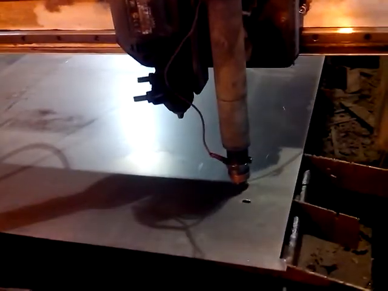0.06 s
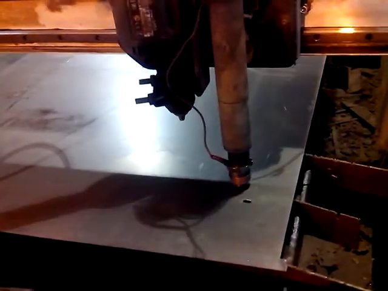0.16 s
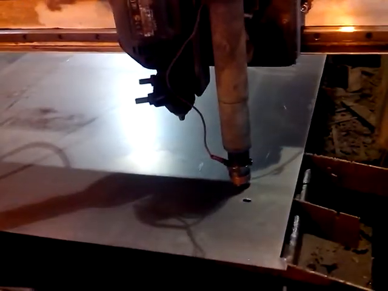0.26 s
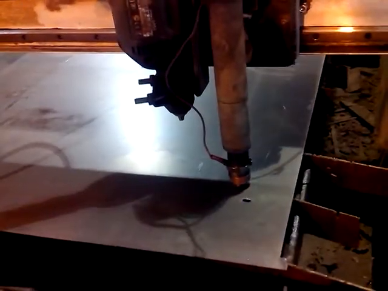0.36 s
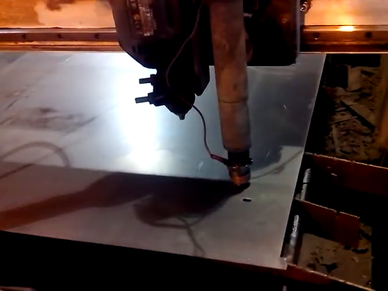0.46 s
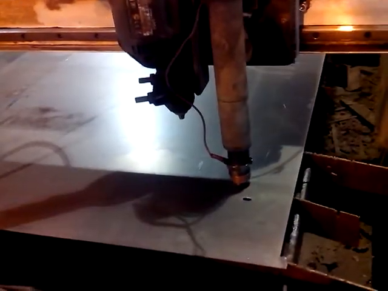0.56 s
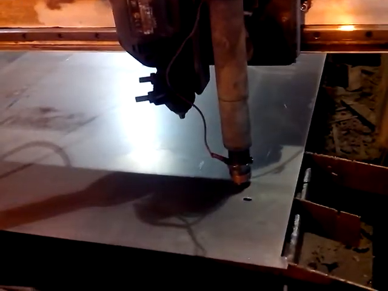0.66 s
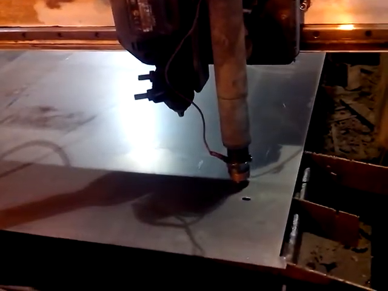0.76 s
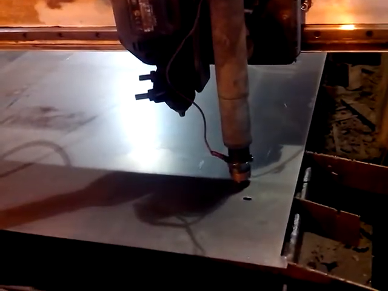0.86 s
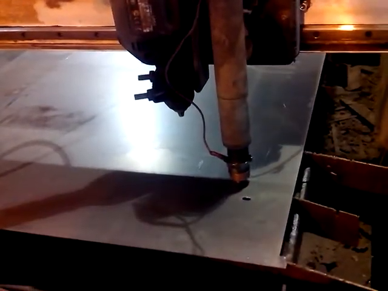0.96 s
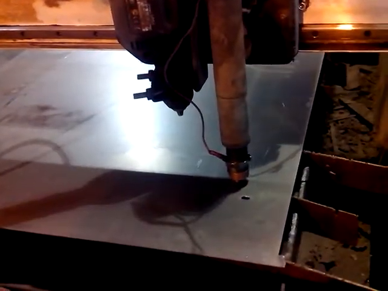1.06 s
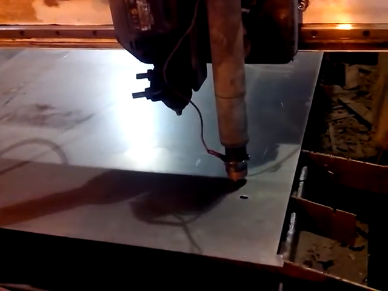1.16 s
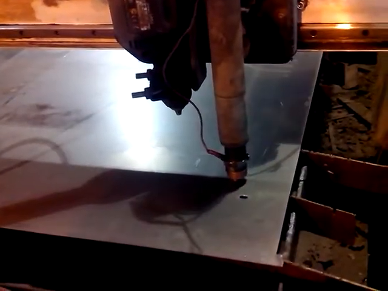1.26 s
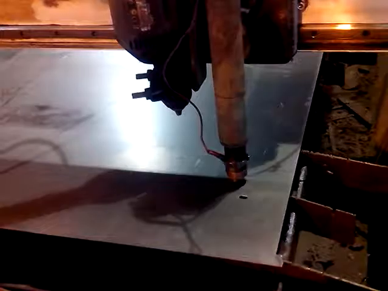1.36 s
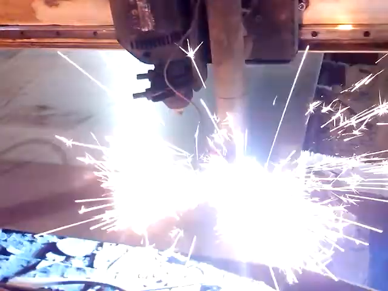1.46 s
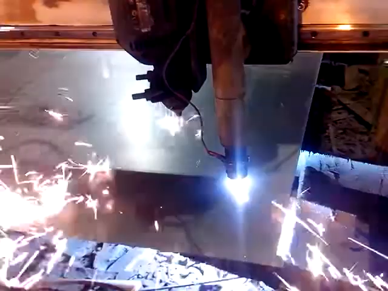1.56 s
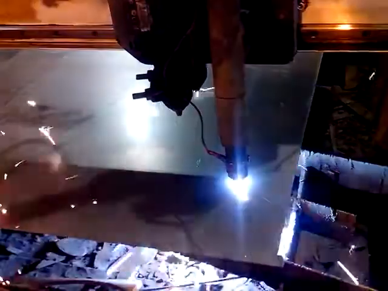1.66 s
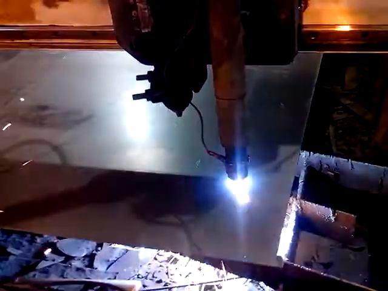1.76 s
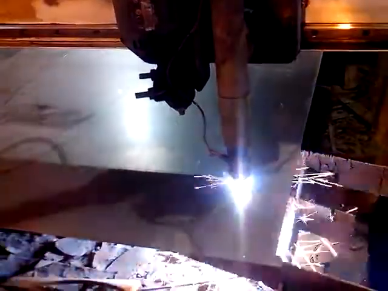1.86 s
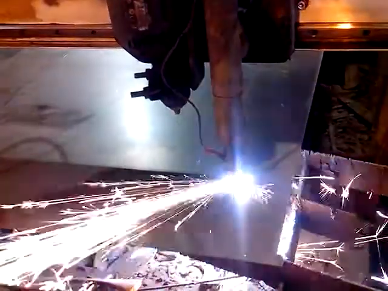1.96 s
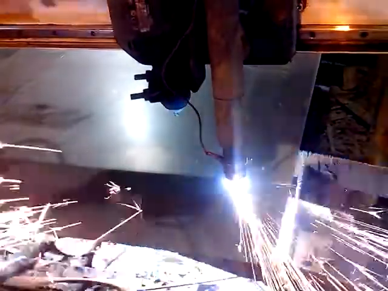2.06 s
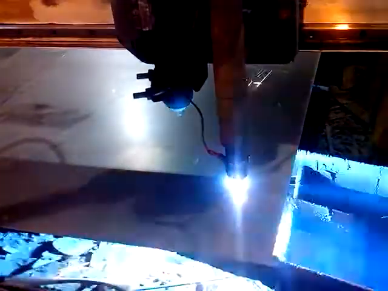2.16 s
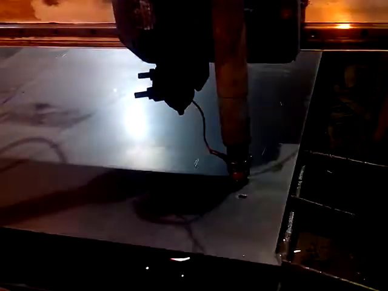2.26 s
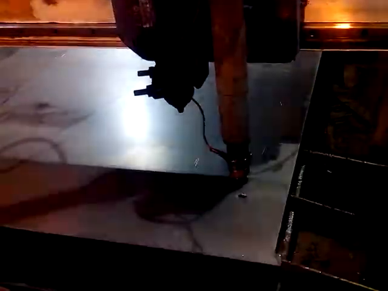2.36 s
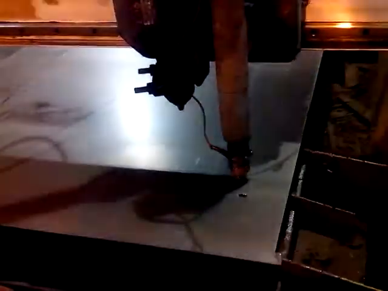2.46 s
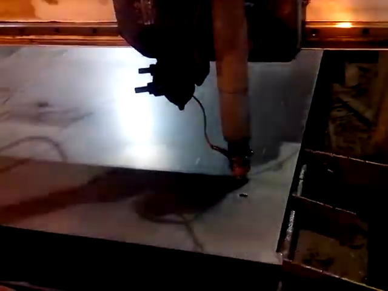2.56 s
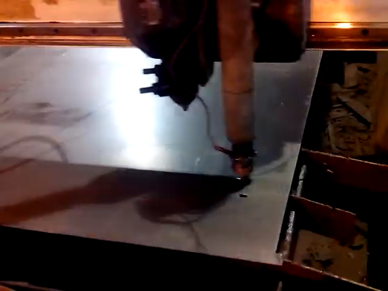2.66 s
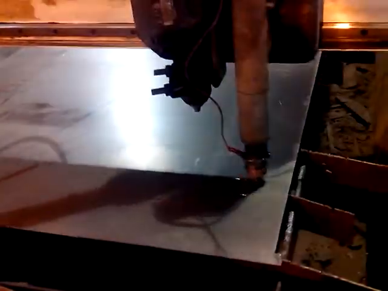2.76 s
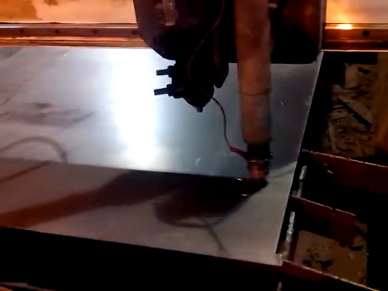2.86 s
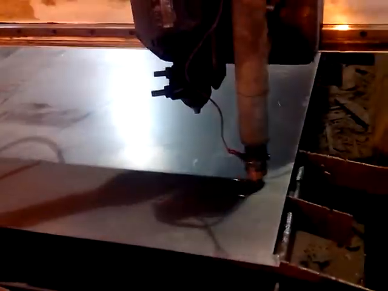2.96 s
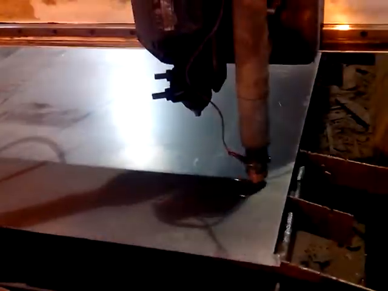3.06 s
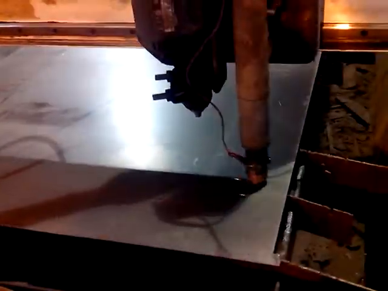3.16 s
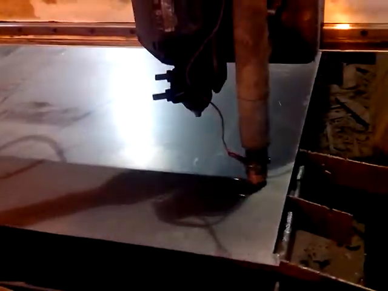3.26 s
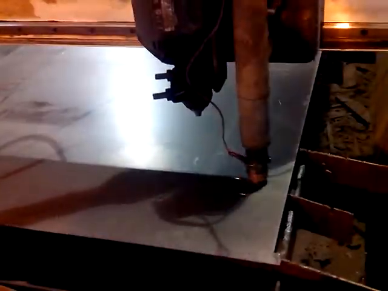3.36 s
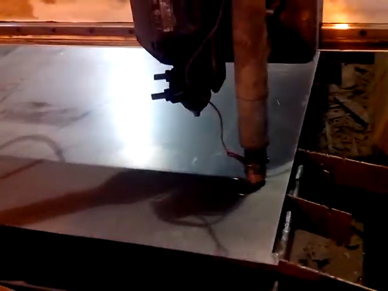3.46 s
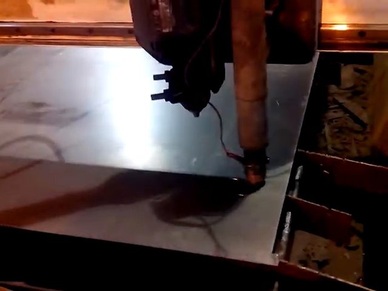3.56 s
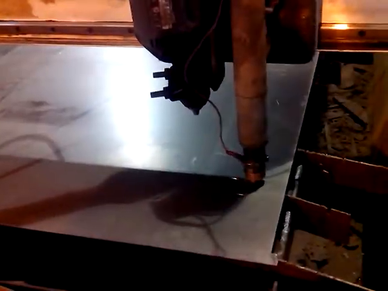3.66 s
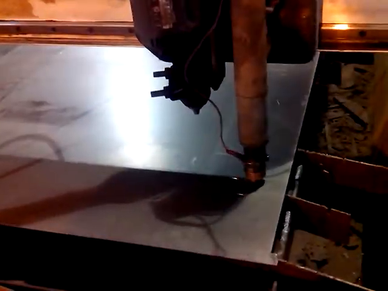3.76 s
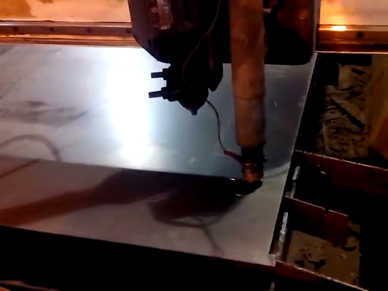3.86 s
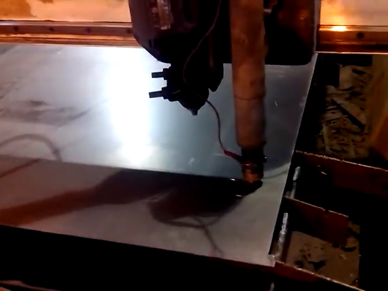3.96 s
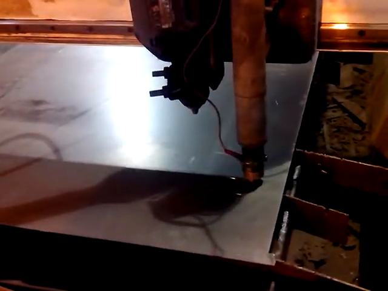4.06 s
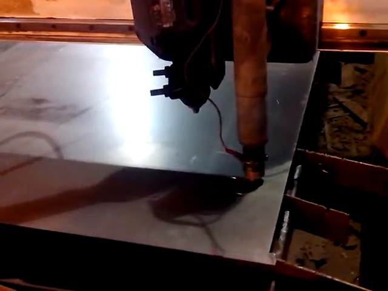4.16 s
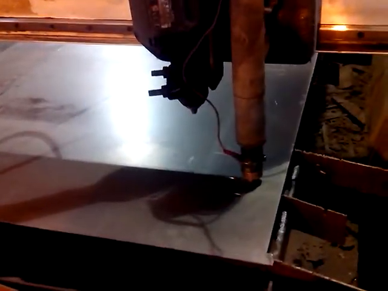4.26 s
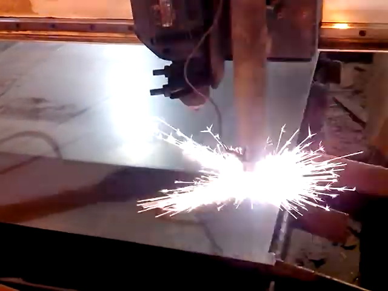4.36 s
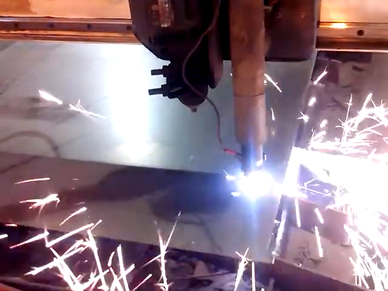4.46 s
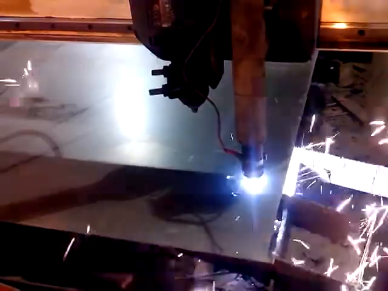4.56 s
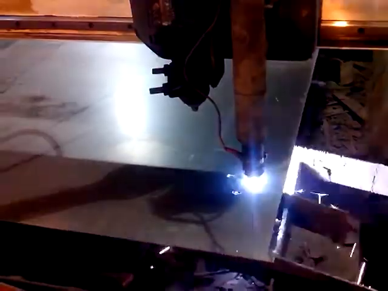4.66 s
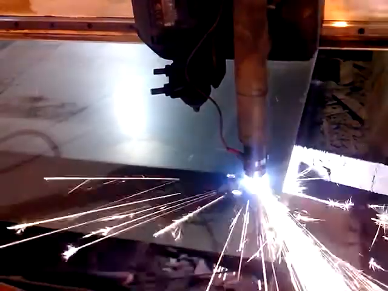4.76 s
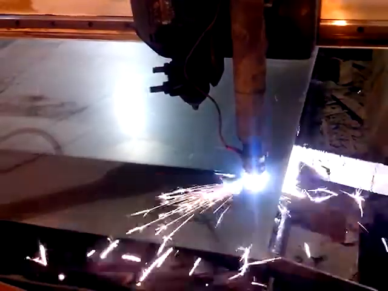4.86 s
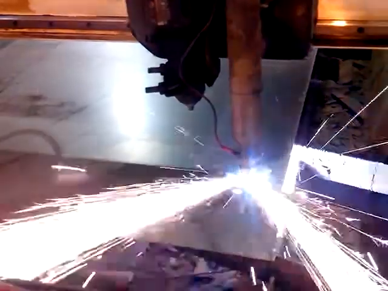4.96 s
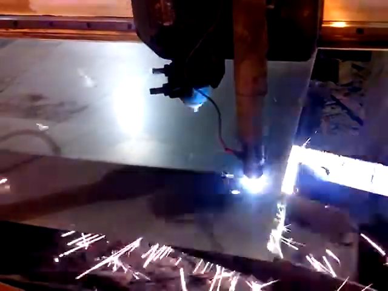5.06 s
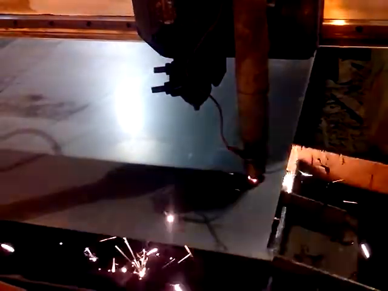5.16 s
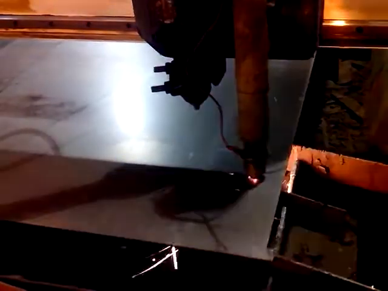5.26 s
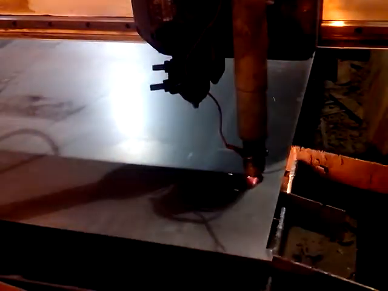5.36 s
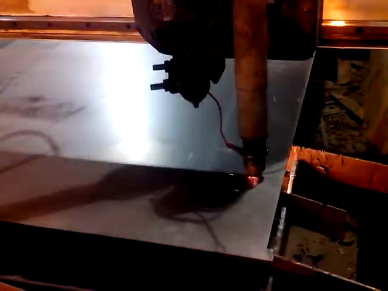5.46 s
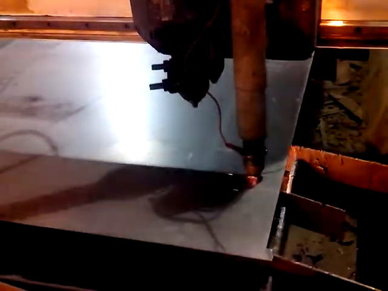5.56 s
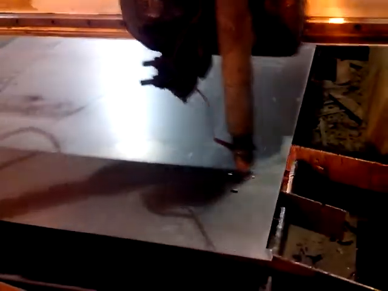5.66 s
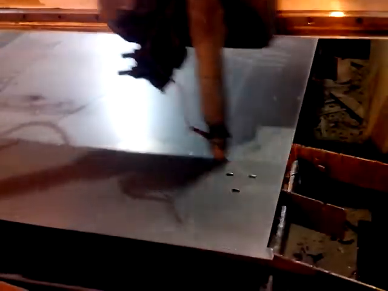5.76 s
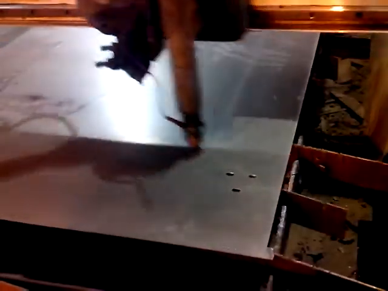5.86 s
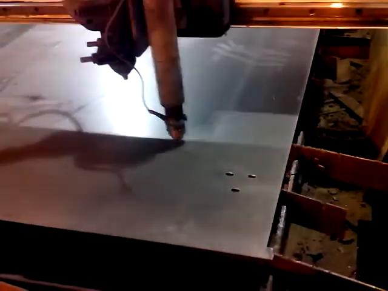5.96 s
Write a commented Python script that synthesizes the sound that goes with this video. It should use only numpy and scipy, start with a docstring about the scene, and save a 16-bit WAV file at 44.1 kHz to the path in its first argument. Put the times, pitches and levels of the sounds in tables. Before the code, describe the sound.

Close to a plasma cutting torch in a workshop, bright compressed air hisses steadily over low machine rumble. A valve thuds, the air dies away, a contactor clunks, and a harsh sputtering arc roars for under a second, ending in a pop. The air swells back, hollower at first, and the whole cycle repeats once, ending on hiss. Small mono recorder, limited treble.

```python
"""A plasma torch blows cooling air onto a steel plate in a workshop: a hiss made of flickering bands of noise.
Twice a valve thuds shut (ringing modes) and the air dies away, a contactor clunks, the arc strikes,
roars while it pierces the plate (hissing and roaring noise) and breaks off with a pop (one swing of pressure).
Narrow howls, bright ticks and a rising hum go with it, over a broad rumble with wavering tones.
A small mono recorder with a low sampling rate listens close by."""
import sys
import numpy as np
from scipy import signal
from scipy.fft import rfft, irfft, next_fast_len
from scipy.io import wavfile
from scipy.ndimage import uniform_filter1d

SR = 44100
rng = np.random.default_rng(int(sys.argv[2]) if len(sys.argv) > 2 else 0)


def unload_wav(signal):
    """Save mono or channel-first audio to the path in sys.argv[1] as 16-bit WAV at rate SR, clipped to [-1, 1]."""
    wavfile.write(
        sys.argv[1],
        SR,
        np.round(np.clip(np.atleast_2d(signal).T, -1, 1) * 32767).astype(np.int16),
    )


N = 264453
SAMPLING_HZ = 16000   # of the recorder
DRIFT_STEP = 40   # slow curves have one value every 40 samples

# the valve closes the air line: start_s, level_db (before the mode levels)
VALVE_SHUTS = [(1.2327, -23), (4.159, -22.5)]
# the contactor switches: start_s, level_db (before the mode levels)
CONTACTOR_SWITCHES = [(1.580, -22.5), (4.5275, -23.5)]
# moments when the arc breaks off: time_s
ARC_ENDS = [2.421, 5.371]
# colour of the arc hiss, set by the torch gap and the hole, one curve a pierce: pitch_hz, level_db (per Hz, relative)
HISS_COLOURS = [
    [(710, -27), (1200, -8), (1610, -19.5), (1910, -6), (2070, -10), (2340, 3), (2560, -2.5), (2800, -2.5),
     (3610, -18.5), (4010, -4.5), (4460, -10.5), (5500, -2), (6150, -10), (6680, -5.5), (7200, -10),
     (9360, -24), (15800, -120)],
    [(710, -30.5), (1200, -11), (1420, -23.5), (1490, -13.5), (1790, -13.5), (1920, -6.5), (2460, -9),
     (2600, -7.5), (4260, -9.5), (4800, 0), (5920, -7.5), (6680, -7.5), (7200, -7.5), (9360, -40.5),
     (15800, -120)],
]


def from_db(db):
    """Decibels to amplitude."""
    return 10 ** (np.asarray(db) / 20)


def rms_one(x):
    """Scale to an rms of 1."""
    return x / np.sqrt(np.mean(x ** 2) + 1e-20)


def in_time(rows):
    """Columns of a curve at every sample."""
    s, *columns = np.transpose(rows)
    return [np.interp(np.arange(N) / SR, s, column) for column in columns]


def drift(rate_hz):
    """Slow chance of rms 1 at every 40th sample: noise through a double one-pole low-pass, run in."""
    run_in = 2000
    r = np.exp(-2 * np.pi * rate_hz * DRIFT_STEP / SR)
    noise = rng.standard_normal(len(range(0, N, DRIFT_STEP)) + run_in)
    return rms_one(signal.lfilter([1], [1, -2 * r, r * r], noise)[run_in:])


def spread(slow):
    """From every 40th sample to every sample."""
    return np.interp(np.arange(N) / DRIFT_STEP, np.arange(len(slow)), slow)


def turbulence(colour, gust_db, patchy_db, rate, tilt_db=0, pivot_hz=4000, resonances=()):
    """Coloured noise, rms 1 before its swells and tilt, in third-octave bands that swell together and flicker alone."""
    size = next_fast_len(N)
    bin_hz = np.maximum(np.arange(size // 2 + 1), 1) * SR / size
    octave = np.log2(bin_hz)
    hz, level_db = np.transpose(colour)
    shape_db = np.interp(octave, np.log2(hz), level_db)
    for peak_hz, width_hz, lift_db in resonances:
        shape_db += lift_db / (1 + (2 * (bin_hz - peak_hz) / width_hz) ** 2)
    spectrum = rfft(rng.standard_normal(size)) * from_db(shape_db) * (bin_hz < SAMPLING_HZ / 2)
    scale = np.sqrt(np.mean(irfft(spectrum, size) ** 2))

    out = np.zeros(N)
    shared_gust_db = gust_db * drift(rate)
    slow_tilt_db = (tilt_db + np.zeros(N))[::DRIFT_STEP]   # dB per octave about the pivot
    top_hz = min(hz[-1], SAMPLING_HZ / 2)
    for centre in np.arange(np.log2(hz[0]), np.log2(top_hz) + 1 / 3, 1 / 3):
        overlap = np.maximum(1 - 3 * abs(octave - centre), 0)   # triangles that cross-fade
        band = irfft(spectrum * overlap, size)[:N]
        band_db = shared_gust_db + patchy_db * drift(rate) + slow_tilt_db * (centre - np.log2(pivot_hz))
        out += band * spread(from_db(band_db))
    return out / scale


def struck(blows, modes):
    """Each blow sets every mode ringing, neighbours in the table in opposite phase."""
    at = [round(s * SR) for s, db in blows]
    blow_db = np.array(blows)[:, 1]
    out = np.zeros(N)
    for k, (hz, level_db, t60_s) in enumerate(modes):
        uneven_db = rng.normal(0, 1, len(at))
        clicks = np.full(N, 1e-18)
        clicks[at] = from_db(blow_db + level_db + uneven_db) * (-1) ** k
        r, w = from_db(-60 / (t60_s * SR)), 2 * np.pi * hz / SR
        out += signal.lfilter([0, np.sin(w)], [1, -2 * r * np.cos(w), r * r], clicks)
    return out


def workshop(x, t60_s):
    """Reflections from plate, frame and walls: a noise tail that decays."""
    t = np.arange(round(.5 * SR)) / SR
    noise = signal.lfilter([.3], [1, -.3], rng.standard_normal(len(t)))
    tail = noise * from_db(-60 * t / t60_s) * (t > .003)
    return signal.fftconvolve(x, tail / np.sqrt(np.sum(tail ** 2)))[:N]


def shop(dull_db):
    """Broad rumble of fans and compressor, with a few tones whose strength and phase waver."""
    # level of the rumble: time_s, level_db
    loudness = [(0, -34), (.33, -31), (.72, -37.5), (1.2, -32), (1.65, -41.5), (2.42, -35), (3.86, -36.5),
                (4.15, -31.5), (4.58, -40.5), (4.85, -32.5), (5.59, -38), (6, -31.5)]
    # colour of the rumble: pitch_hz, level_db (per Hz, relative)
    colour = [(15, -44.5), (25, -5.5), (60, -0.5), (81, -5.5), (108, -11.5), (135, -0.5), (241, -6),
              (357, -4), (501, -5), (560, -4), (895, -3.5), (1540, -9.5), (2200, -11.5), (2860, -18),
              (4840, -120)]
    # tones in the rumble: pitch_hz, level_db (middle amplitude)
    tones = [(91.5, -50.5), (140.0, -53), (888.2, -66), (1109, -54.5), (1308, -62.5)]
    air_share = 0.17   # part of the rumble is air noise: share of the jet's loss of treble
    t = np.arange(N) / SR
    level_db, = in_time(loudness)
    hum = np.zeros(N)
    for hz, db in tones:
        strength = from_db(db + 3.0 * spread(drift(4.0)))
        hum += strength * np.sin(2 * np.pi * hz * t + 1.5 * spread(drift(6.0)))
    rumble = turbulence(colour, gust_db=0.93, patchy_db=1.5, rate=5.7, tilt_db=-air_share * dull_db, pivot_hz=398)
    return from_db(level_db) * rumble + hum


def valve_thuds():
    """The closing valve rings in low modes."""
    # ringing of the valve: pitch_hz, level_db, t60_s
    modes = [(145, -1.5, 0.15), (99.5, -9, .2), (120.3, -3, 0.15), (199.5, 0, 0.086), (299, -5, 0.12),
             (358, -3.5, 0.1)]
    return struck(VALVE_SHUTS, modes)


def contactor_clunks():
    """The switching contactor rings in its own modes."""
    # ringing of the contactor: pitch_hz, level_db, t60_s
    modes = [(378, 4, 0.058), (142, -5, 0.18), (965, -8, 0.36), (183, -10, 0.78), (288, -11, 0.26),
             (1190, -21, 0.18)]
    return struck(CONTACTOR_SWITCHES, modes)


def glides():
    """A soft low hum glides up in pitch after each valve thud, under a rounded swell."""
    wait_s, length_s, from_hz, to_hz, level_db = .03, .14, 95, 165, -37
    turn, out = np.arange(0, 1, 1 / (length_s * SR)), np.zeros(N)
    phase = 2 * np.pi * np.cumsum(from_hz + (to_hz - from_hz) * turn) / SR
    tone = from_db(level_db) * np.sqrt(np.sin(np.pi * turn)) * np.sin(phase)
    for s, db in VALVE_SHUTS:
        at = round((s + wait_s) * SR)
        out[at:at + len(turn)] += tone
    return out


def ticks():
    """Contact bounce, starting sparks and the snap as the arc breaks: bright noise bursts that die at once."""
    # start_s, peak_db (rough; the burst of noise starts at an rms 5 dB lower), t60_s
    bursts = [(1.592, -28.5, 0.032), (1.642, -13, 0.041), (1.673, 1, 0.016), (2.4192, -12, 0.009),
              (4.540, -25.5, .05), (4.591, -8, 0.011), (4.6095, -9, 0.03), (4.626, -2.5, 0.026),
              (5.3687, -6, 0.0084)]
    t, swell = np.arange(N) / SR, np.zeros(N)
    for s, peak_db, t60_s in bursts:
        swell += from_db(peak_db - 5.0 - 60 * np.maximum(t - s, 0) / t60_s) * (t >= s)
    return swell * turbulence(HISS_COLOURS[1], gust_db=-2.5, patchy_db=0, rate=13)


def pops():
    """Pressure pops of the arc column: one squarish swing, up and then harder down."""
    # start_s, level_db (before shaping), length_ms
    swings = [(1.6402, -16, 1.0), (2.3025, -7, 1.9), (2.419, -5.5, 1.8), (4.59, -19.5, 2.3),
              (5.3683, -4, 1.5)]
    out = np.zeros(N)
    for s, level_db, ms in swings:
        turn = np.arange(0, 1, 1000 / (ms * SR))
        at = round(s * SR)
        squarish = np.tanh(2.0 * np.sin(2 * np.pi * turn))
        out[at:at + len(turn)] += from_db(level_db) * squarish * (0.48 + .5 * turn)
    return out


def howls():
    """Brief narrow howls and puffs of the jet: noise through a resonance under a bell-shaped swell."""
    # top_s, length_s, pitch_hz, width_hz, level_db (rms at the top)
    puffs = [(1.347, 0.029, 1840, 400, -25), (1.677, 0.027, 5200, 710, -18.5),
             (1.682, 0.043, 940, 200, -24.5), (1.71, 0.064, 2660, 160, -18), (1.94, 0.033, 760, 350, -26),
             (2.113, 0.027, 520, 353, -32), (2.238, 0.026, 5500, 600, -22.5),
             (2.274, 0.019, 2430, 150, -16), (4.715, 0.028, 960, 79, -15), (4.748, 0.025, 940, 199, -17.5),
             (4.734, 0.041, 1880, 80.5, -24), (4.963, 0.064, 960, 150, -30), (4.97, .05, 5300, 604, -18),
             (5.164, 0.044, 4940, 400, -15), (5.33, 0.036, 5280, 400, -22.5), (5.892, 0.02, 3950, 200, -24)]
    out, white = np.zeros(N), rng.standard_normal((len(puffs), SR // 4))
    t = np.arange(-SR // 8, SR // 4 - SR // 8) / SR   # zero at the top
    for noise, (s, length_s, hz, width_hz, level_db) in zip(white, puffs):
        r, at = np.exp(-np.pi * width_hz / SR), round(s * SR) - SR // 8
        sung = signal.lfilter([1, 0, -1], [1, -2 * r * np.cos(2 * np.pi * hz / SR), r * r], noise)
        bell = np.exp(-(2 * t[:len(noise)] / length_s) ** 2)
        out[at:at + len(noise)] += (from_db(level_db) * rms_one(sung) * bell)[:N - at]
    return out


def air_pressure():
    """Hiss level and loss of treble: the hiss rises to its full level, bleeds away after a thud, returns faintly for the arc."""
    # rise of the hiss: start_s, full_db, quick_shortfall_db (negative overshoots), slow_shortfall_db, slow_time_s
    rises = [(0, -21, -1.5, 5.5, 0.15), (2.45, -20, 9, 6.5, 1.15), (5.36, -22, -5, 8.5, 0.18)]
    quick_s = 0.042   # time constant
    # once the valve shuts the line bleeds down to a trickle; the treble loss is in dB per octave
    bleed_wait_s, bleed_db_per_s, trickle_db = 0.048, 88.5, -45.5
    bleed_dull_db, bleed_dull_s = 11.0, 0.14
    # with the contactor the gas for the arc comes on, brighter again
    pilot_db, pilot_rise_s = -33, 0.065
    t = np.arange(N) / SR
    hiss_db, dull_db = np.full(N, trickle_db), np.zeros(N)
    shuts = [s for s, db in VALVE_SHUTS] + [N / SR]
    for (start, full_db, quick_db, slow_db, slow_s), shut in zip(rises, shuts):
        age, bled = np.maximum(t - start, 0), np.maximum(t - shut, 0)
        level_db = full_db - quick_db * np.exp(-age / quick_s) - slow_db * np.exp(-age / slow_s)
        level_db = np.maximum(level_db - bleed_db_per_s * np.maximum(bled - bleed_wait_s, 0), trickle_db)
        hiss_db = np.where(t >= start, level_db, hiss_db)
        dull_db = np.where(t >= start, bleed_dull_db * (1 - np.exp(-bled / bleed_dull_s)), dull_db)
    for (clunk, db), (start, *rest) in zip(CONTACTOR_SWITCHES, rises[1:]):
        pilot = np.clip((t - clunk) / pilot_rise_s, 0, 1) * (t < start)
        hiss_db = hiss_db + pilot * (pilot_db - hiss_db)
        dull_db = dull_db * (1 - .6 * pilot)
    return uniform_filter1d(hiss_db, size=1500), dull_db


def air_jet(hiss_db, dull_db):
    """Steady hiss; as pressure falls the treble dies first; after a cut it is hollower until the torch leaves the hole."""
    # air blowing onto the plate: pitch_hz, level_db (per Hz, relative)
    plate_colour = [(530, -32), (900, -17), (1220, -21.5), (1320, -12), (1540, -15.5), (1670, -12.5),
                    (2650, -10), (2860, -6.5), (4160, -8), (4660, -2), (5740, -4.5), (6540, -1.5),
                    (7200, -5.5), (9360, -39), (15800, -120)]
    # air blowing into the fresh hole: pitch_hz, level_db (per Hz, relative)
    hole_colour = [(530, -30), (900, -4.5), (965, -10), (1060, -7), (1440, -9.5), (1810, -6.5),
                   (1970, -8.5), (2740, -3), (3780, -9), (4740, -1), (6050, -4.5), (6540, 0), (7200, -4.5),
                   (9360, -38), (15800, -120)]
    # the torch starts to move off the hole: time_s
    departures = [2.9, 5.68]
    leaving_s = .12
    t = np.arange(N) / SR
    tilt_db = 1.32 - dull_db   # dB per octave
    share = np.zeros(N)   # of the jet's power that blows into the hole
    for cut, leaves in zip(ARC_ENDS, departures):
        share += (t >= cut) * np.clip(1 - (t - leaves) / leaving_s, 0, 1)
    on_plate = turbulence(plate_colour, gust_db=.3, patchy_db=.7, rate=6.1, tilt_db=tilt_db)
    in_hole = turbulence(hole_colour, gust_db=-0.43, patchy_db=2.0, rate=3.2, tilt_db=tilt_db - 1.3)
    return from_db(hiss_db) * (np.sqrt(1 - share) * on_plate + np.sqrt(share) * in_hole)


def arc():
    """Sputtering hiss of the plasma jet over the lumpy roar of molten metal blown out."""
    # one curve a pierce: time_s, hiss_db, roar_db, hiss_tilt_db (per octave)
    pierces = [
        [(1.638, -29.5, -37.5, 2), (1.658, -26.5, -40, 2), (1.678, -17, -25, 4.5), (1.718, -12, -29, 1),
         (1.745, -20, -29, 2), (1.846, -18, -29, 1.5), (1.944, -16, -26, 0), (1.986, -15, -26.5, 1.5),
         (2.03, -21, -31, 3), (2.09, -16, -24, 3), (2.165, -18, -30.5, 3), (2.185, -16, -25, 4),
         (2.29, -16.5, -26.5, 3.5), (2.32, -17, -29, 0), (2.41, -16.5, -26.5, 0.9)],
        [(4.587, -31.5, -31, -1), (4.617, -18.5, -37, 3), (4.655, -19.5, -23.5, -0.5),
         (4.69, -17.5, -27.5, -1.5), (4.742, -14.5, -21.5, 1), (4.774, -16.5, -23, -1.7),
         (4.868, -15.5, -27, -1), (4.955, -13, -20.5, -0.2), (5.004, -16, -32.5, 2.2), (5.122, -13.5, -23.5, 0),
         (5.18, -14.5, -26, 1), (5.218, -16, -27, .5), (5.292, -22, -38.5, -2), (5.332, -16.5, -25.5, -0.5),
         (5.36, -20.5, -31.5, -3)],
    ]
    # narrow resonances of nozzle and hole, one list a pierce: pitch_hz, width_hz, lift_db
    pierce_resonances = [
        [(2380, 140, -3.5), (2840, 58, 4.5), (3514, 160, 11.5), (3920, 240, 2.5), (5800, 110, 1.5)],
        [(1970, 82, -2.5), (2650, 73, 1.5), (2740, 47, 3), (4880, 86, -3), (6560, 120, 7)],
    ]
    # colour of the roar: pitch_hz, level_db (per Hz, relative)
    roar_colour = [(47, -23.5), (80, -17), (119, -12), (306, -2), (401, 0), (799, 0.5), (994, 1.5),
                   (1280, -7), (1700, -4.5), (2210, -42), (3740, -120)]
    t, out = np.arange(N) / SR, np.zeros(N)
    roar = turbulence(roar_colour, gust_db=1.5, patchy_db=1.0, rate=18.0)
    for rows, end, colour, resonances in zip(pierces, ARC_ENDS, HISS_COLOURS, pierce_resonances):
        hiss_db, roar_db, tilt_db = in_time(rows)
        hiss = turbulence(colour, gust_db=0.1, patchy_db=1.4, rate=44.0, tilt_db=tilt_db, resonances=resonances)
        burning = (t >= rows[0][0]) * (t < end)
        out += burning * (from_db(hiss_db) * hiss + from_db(roar_db) * roar)
    return out


def scene():
    """Torch and machine with their reflections, over the shop rumble."""
    hiss_db, dull_db = air_pressure()
    knocks = valve_thuds() + contactor_clunks() + pops() + ticks()
    close = arc() + howls() + glides() + knocks
    jet = air_jet(hiss_db, dull_db)
    reflections = from_db(-13.0) * workshop(close, t60_s=0.35) + from_db(-10.5) * workshop(jet, t60_s=0.48)
    mono = close + jet + reflections + shop(dull_db)
    return np.array([mono, mono])


def record(dry):
    """Peaks are rounded, bass is thin; treble ends at half the sampling rate with a faint mirror of it above."""
    size = next_fast_len(N + 4096)
    hz = np.arange(size // 2 + 1) * SR / size
    spectrum = rfft(1.075 * np.tanh(dry / 1.113), size)
    response_db = np.interp(hz, [20, 70, 7100, 7500, 7900, 7990, 8010], [-20.0, -0.5, 0.5, -4.0, -25.5, -56, -120])
    under = irfft(spectrum * from_db(response_db), size)[:, :N]
    # f turns into sampling rate - f
    mirrored = under * 2 * np.cos(2 * np.pi * SAMPLING_HZ * np.arange(N) / SR)
    fading_db = np.interp(hz, [7990, 8010, 8120, 9070, 9600], [-120, 5.0, 1.0, -39.5, -44.5])
    both = under + irfft(rfft(mirrored, size) * from_db(fading_db), size)[:, :N]
    # steep low-pass, 40 dB down from 9260 Hz
    return signal.sosfilt(signal.cheby2(28, 40, 9260, fs=SR, output="sos"), both)


dry = scene()
out = record(dry)
unload_wav(out)
```